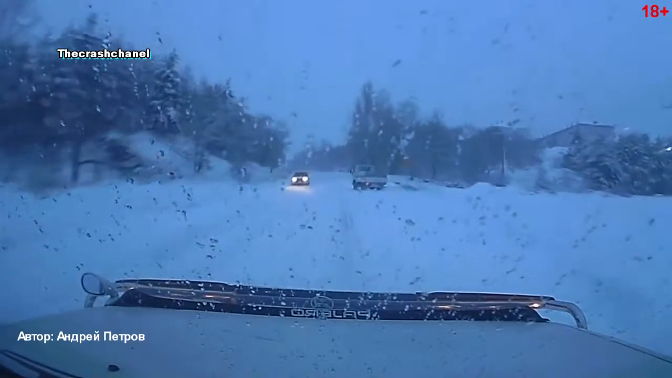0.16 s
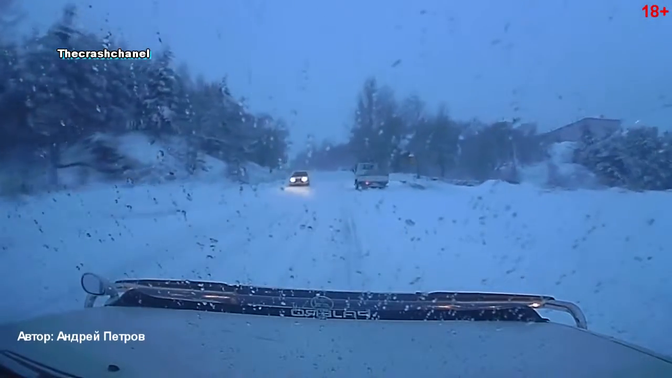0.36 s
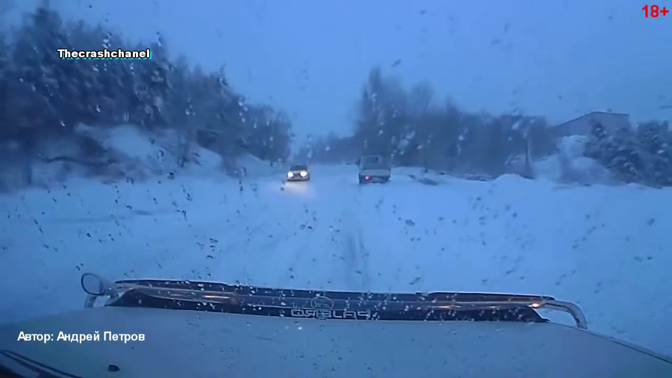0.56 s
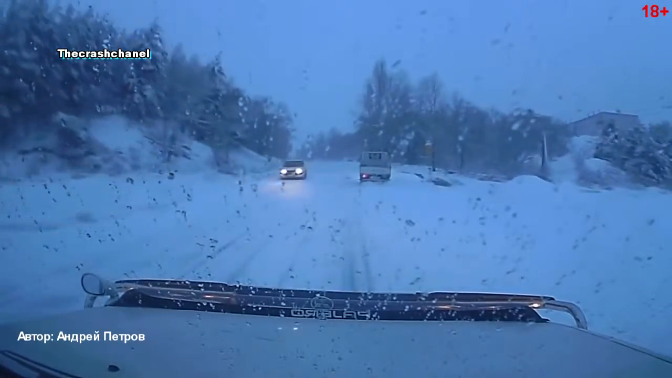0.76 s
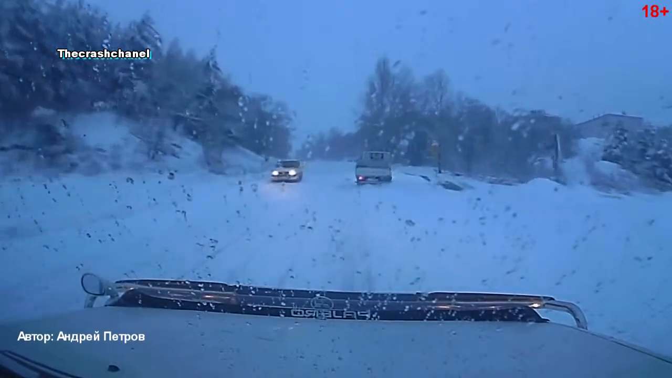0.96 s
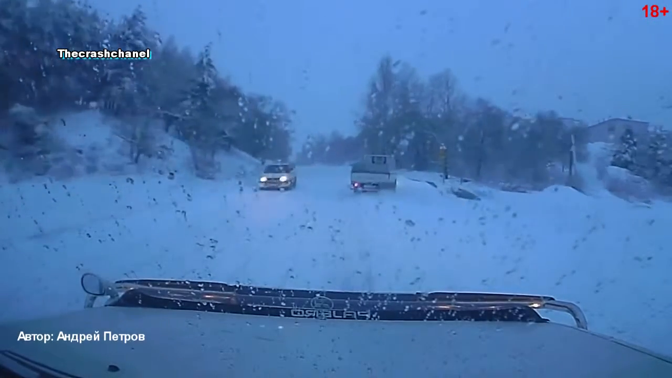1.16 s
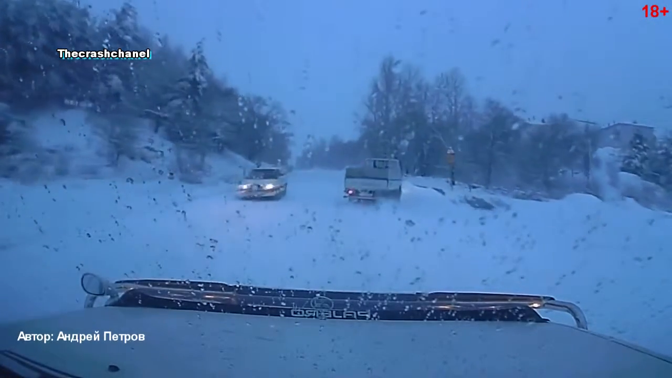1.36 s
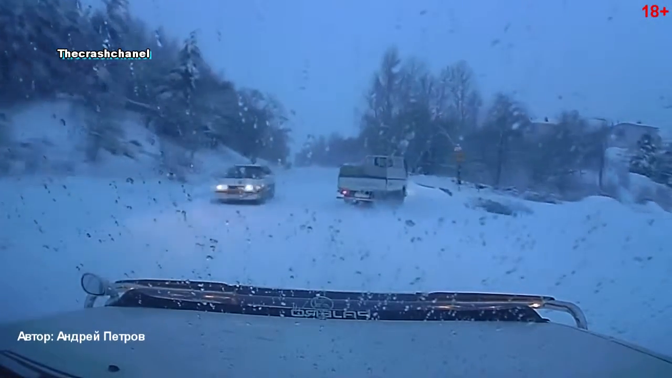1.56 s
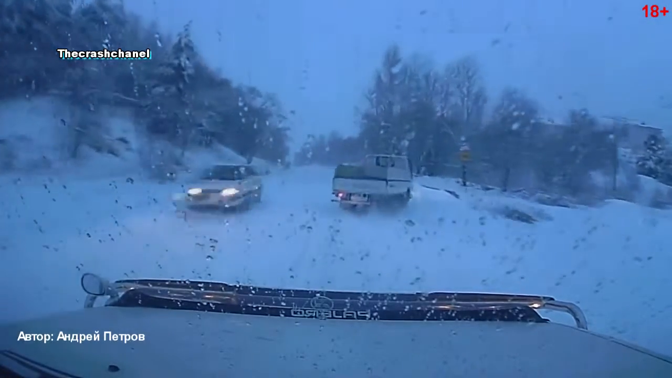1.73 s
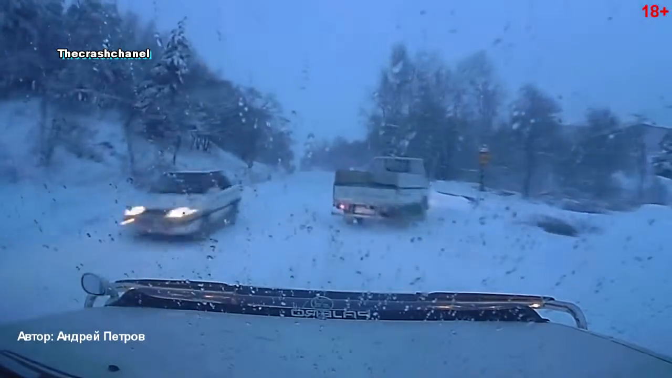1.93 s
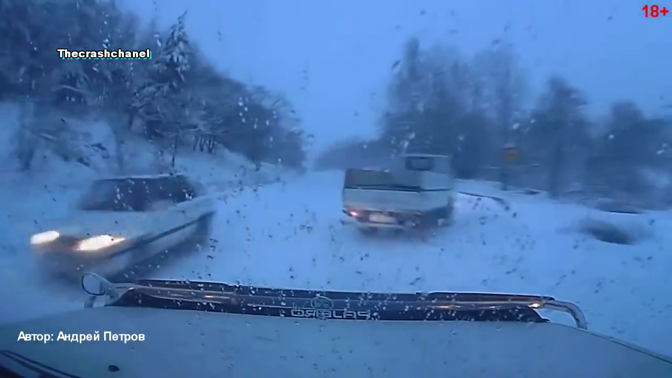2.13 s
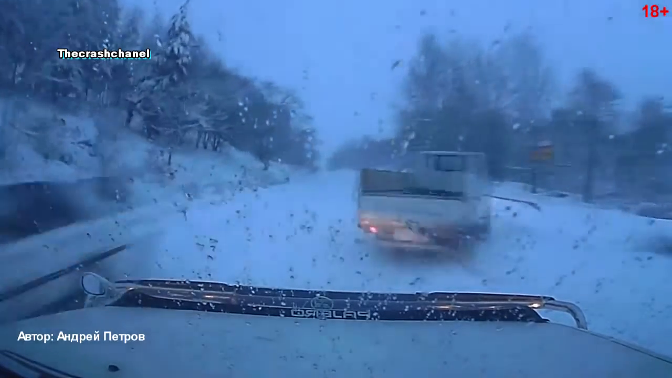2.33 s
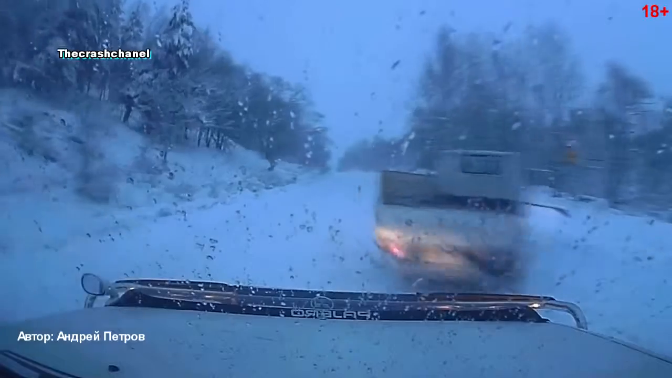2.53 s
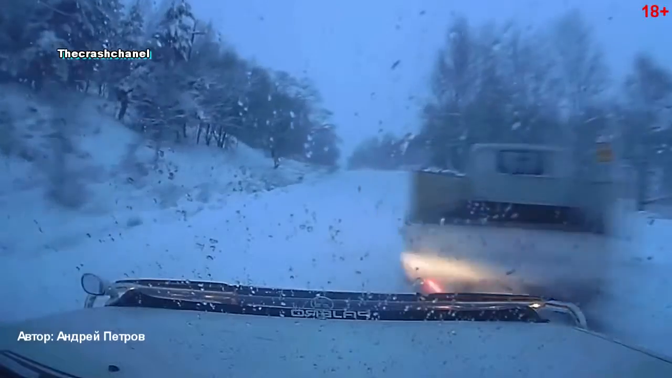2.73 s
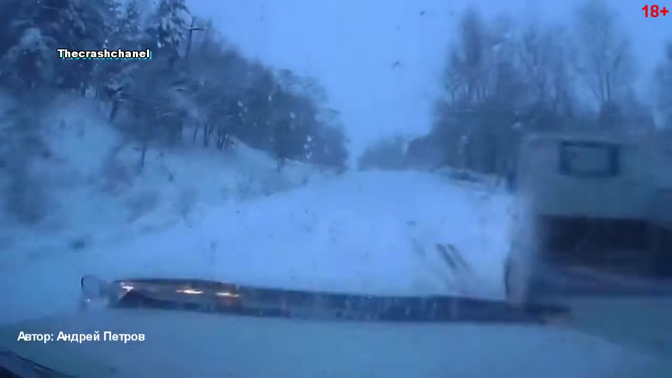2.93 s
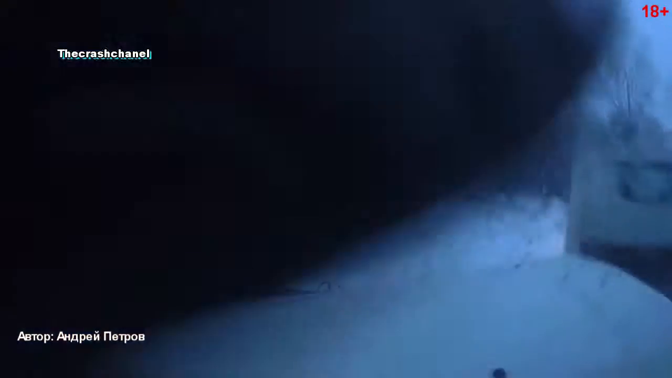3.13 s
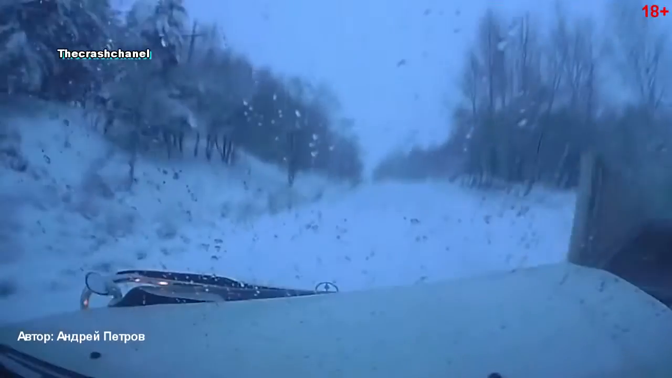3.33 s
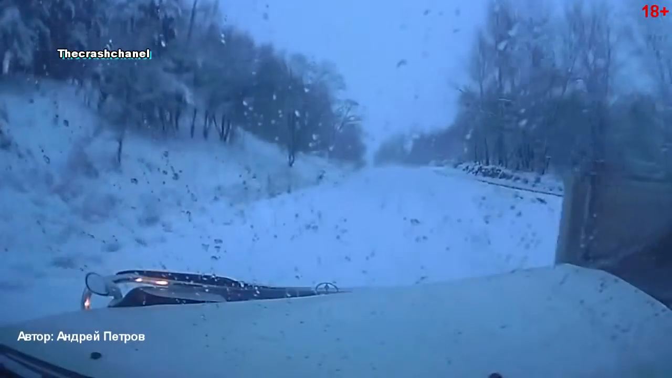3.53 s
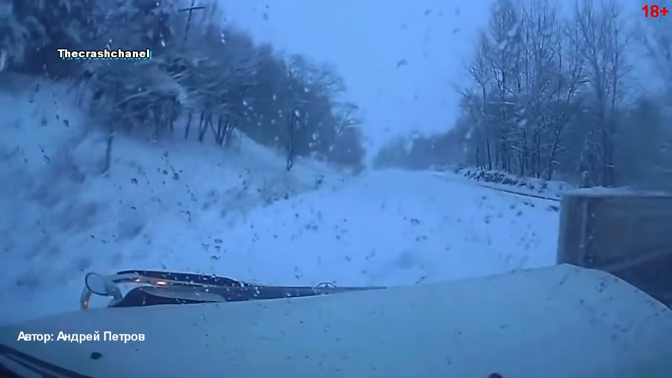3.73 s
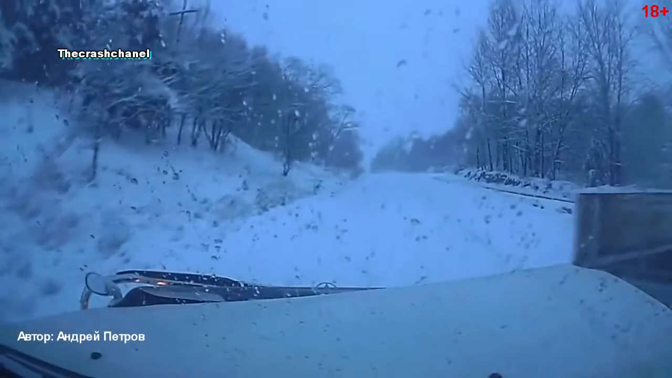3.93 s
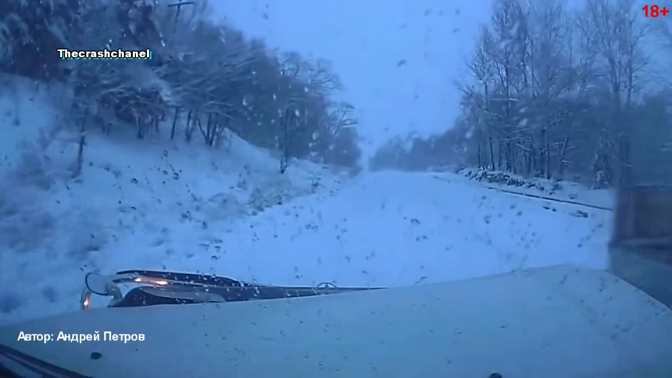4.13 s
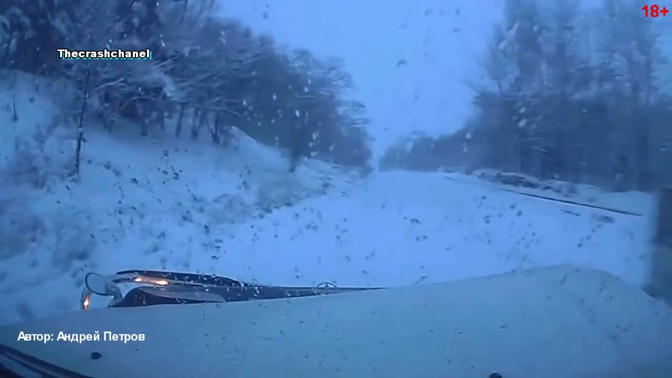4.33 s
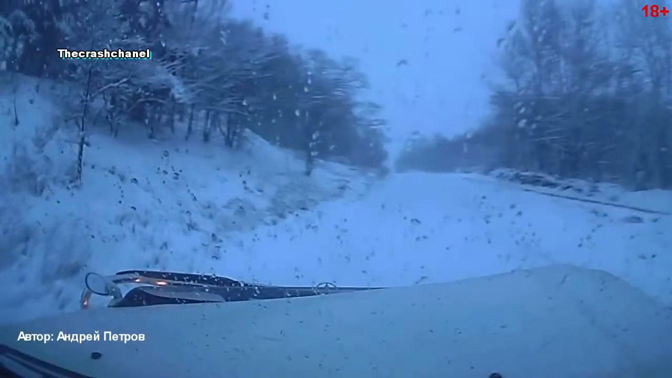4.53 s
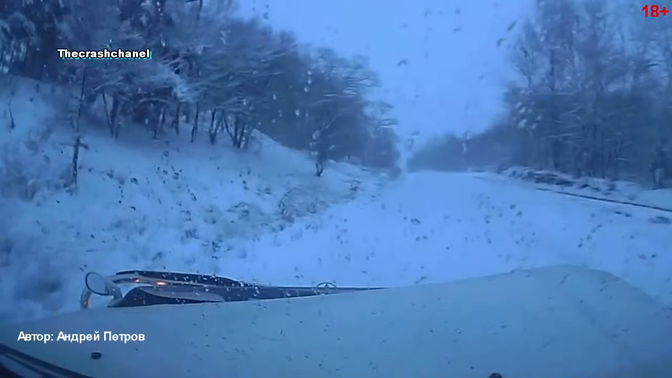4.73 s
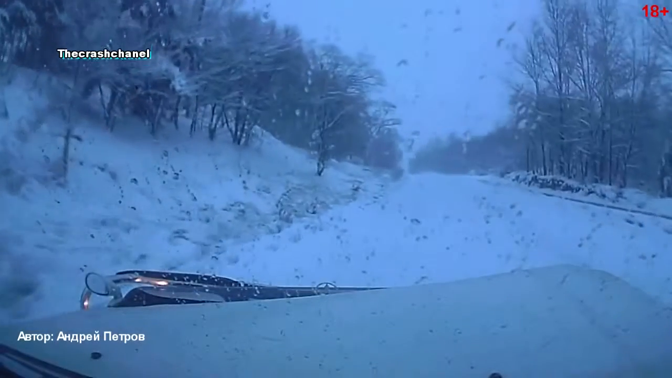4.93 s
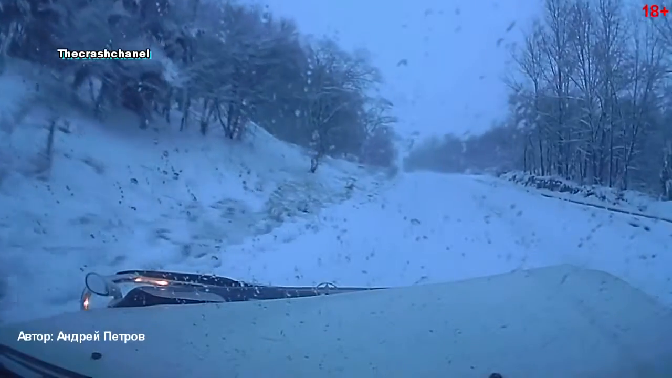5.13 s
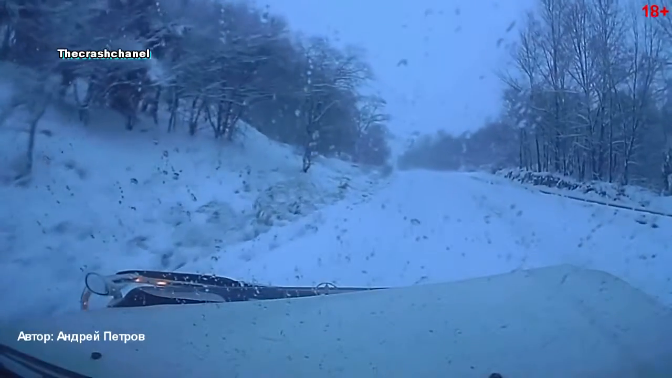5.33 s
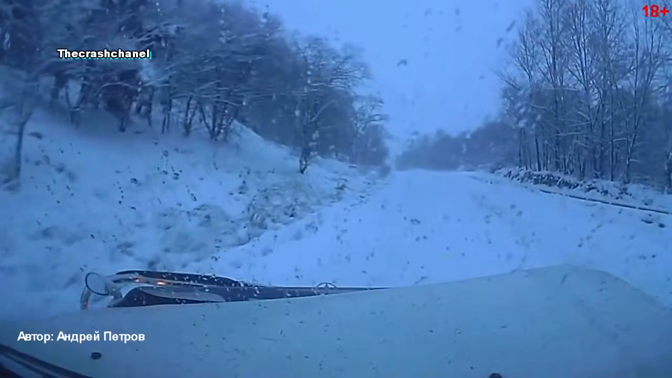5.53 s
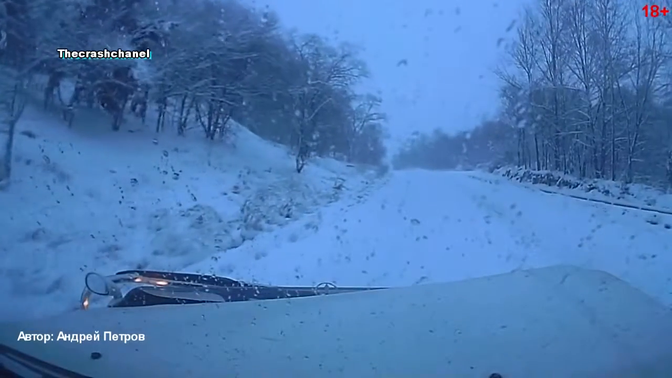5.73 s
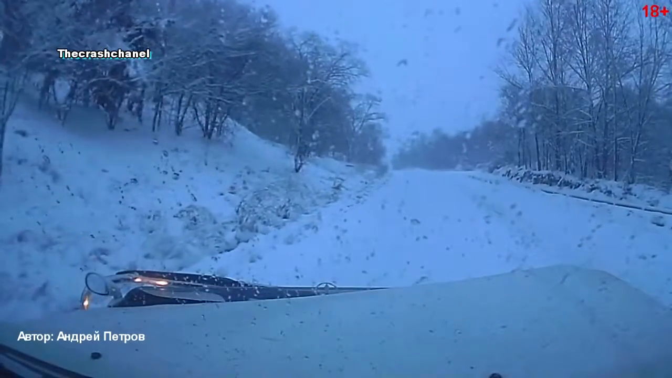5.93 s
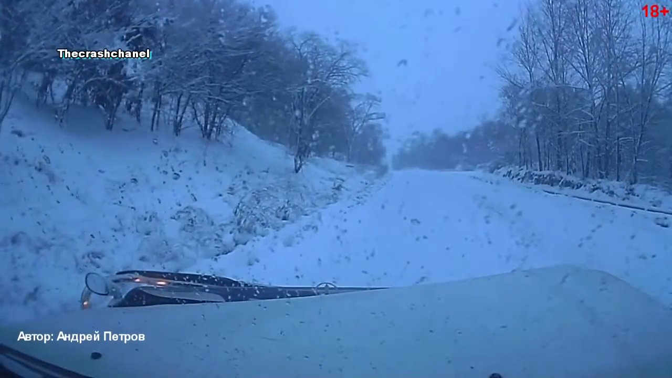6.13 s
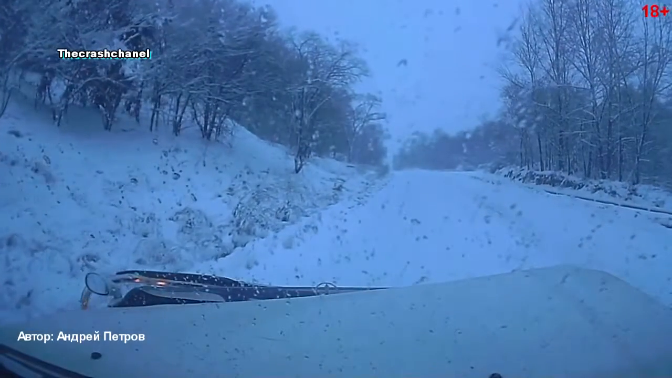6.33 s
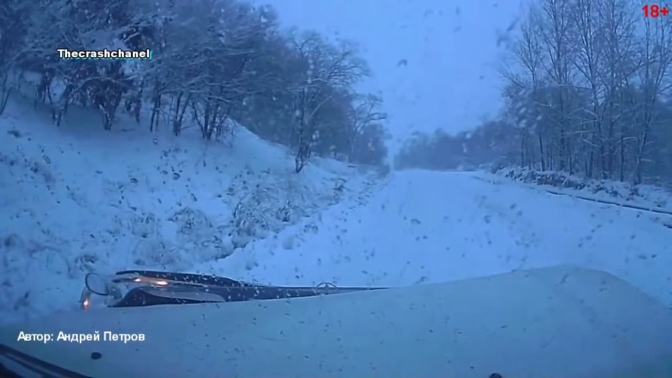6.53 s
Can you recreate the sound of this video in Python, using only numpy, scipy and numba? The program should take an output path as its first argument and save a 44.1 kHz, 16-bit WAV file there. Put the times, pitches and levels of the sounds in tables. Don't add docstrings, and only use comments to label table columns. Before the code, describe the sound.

Heard from inside a car through a small, hissy dashboard microphone. From 0 to 2 seconds, muffled tyre rumble on packed snow and a low chassis boom, with soft trim knocks and a brief low drone at the start. From 2 to 2.9, plastic creaks and knocks, a strong thump at 2.7. At 3.02 the car strikes a truck: a sudden, overloaded burst of folding sheet metal, deep thud, sharp snaps and splintering plastic, about 0.15 seconds long. A second slam at 3.23 leads into clattering rebounds and bright tinkling glass, fading by 3.8. A quiet gap with small ticks follows. From 4.2 to 5.4, snow grinds hollowly under the floor with a low shuddering groan and hard lumps cracking; rapid, heavy judders knock from 5.02 to 5.36. Then it stops: faint low engine idle, soft rumble, hiss, intermittent thin electronic buzz, and a last knock at 6.54.

```python
import sys
import numpy as np
from scipy import signal
from scipy.fft import rfft, irfft, next_fast_len
from scipy.io import wavfile
from scipy.ndimage import uniform_filter1d, map_coordinates
from numba import njit

SR = 44100
rng = np.random.default_rng(int(sys.argv[2]) if len(sys.argv) > 2 else 0)


def how_loud(loudness_db):
    steps = np.asarray(loudness_db, float) / 20
    return 10 ** steps


def log_audio(samples):
    frames = np.atleast_2d(samples).T
    limited = np.clip(frames, -1, 1)
    pcm = np.round(limited * 32767).astype(np.int16)
    wavfile.write(sys.argv[1], SR, pcm)


N = 289957
T = np.arange(N) / SR
IMPACT_S, SECOND_SLAM_S = 3.016, 3.23

# (time [s], level [dB])
CRUSH_FORCE = [
    (3.016, -16.5),
    (3.021, -17.5),
    (3.052, -11),
    (3.15, -16),
    (3.205, -32.5),
    (3.246, -23),
    (3.324, -36),
    (3.744, -46.5),
    (3.85, -64),
]
# (time [s], level [dB])
FOLD_FORCE = [(3.016, -20.5), (3.022, -11.5), (3.045, -12.5), (3.057, -9.5), (3.075, -9), (3.09, -11.5),
              (3.112, -13), (3.125, -10), (3.155, -17)]
# (frequency [Hz], density [dB per Hz])
BONNET_SPECTRUM = [(150, -9), (230, -6.5), (320, -4.5), (450, -11.5), (700, -15.5), (1200, -25),
                   (3000, -56)]
# (frequency [Hz], density [dB per Hz])
STEEL_SPECTRUM = [(71, -39), (120, -11), (192, -6.5), (398, -3.5), (431, -9.5), (664, -9.5), (739, -24),
                  (1150, -20.5), (1920, -51), (2200, -36.5), (3000, -50.5), (3900, -63), (6600, -120)]
# (frequency [Hz], density [dB per Hz])
SPLINTER_SPECTRUM = [(1500, -27.5), (2250, -11), (2700, -11), (3200, 2), (3800, -15.5), (4550, -2),
                     (5100, 0), (5550, -10), (8000, -9.5), (15500, -13.5)]
# (time [s], peak [dB], edge [ms])
SNAPS = [(3.0179, -37.5, 0.36), (3.0204, -36, 0.084), (3.0244, -36.5, 0.16), (3.0311, -39, 0.11),
         (3.032, -42.5, 0.048), (3.0355, -37.5, 0.14), (3.0389, -35.5, 0.1), (3.0424, -33, 0.1),
         (3.0469, -33, 0.065), (3.0497, -35, 0.08), (3.0523, -28.5, 0.096), (3.0548, -20.5, .055),
         (3.0567, -33.5, .06), (3.0597, -27, 0.074), (3.0631, -31, 0.096), (3.066, -26, 0.053),
         (3.0699, -28, 0.09), (3.0708, -32, 0.1), (3.0768, -34, .08), (3.0832, -32.5, 0.089),
         (3.09, -31.5, 0.13), (3.0943, -33, 0.096), (3.097, -34, 0.082), (3.1051, -32, 0.11),
         (3.1088, -35, 0.12), (3.1153, -28.5, 0.2), (3.1216, -32, .1), (3.1247, -30.5, 0.12),
         (3.1287, -26.5, 0.17), (3.1351, -38, 0.073), (3.1459, -34, 0.2), (3.1624, -44.5, 0.13),
         (3.1717, -36.5, 0.24), (3.175, -27, 0.45), (3.231, -43, 0.21), (3.2494, -59, 0.019),
         (3.253, -58, .03), (3.287, -49, 0.12)]
# (time [s], peak [dB], low panel [Hz], click [dB])
REBOUND_BLOWS = [(3.16, -17, 370, -26), (3.18, -26, 247, -45), (3.193, -24.5, 244, -45),
                 (3.208, -31, 289, -45), (3.218, -29, 269, -45), (3.23, -17.5, 452, -27),
                 (3.241, -32, 366, -32), (3.248, -22.5, 403, -17), (3.255, -22, 376, -40),
                 (3.268, -32, 305, -36), (3.283, -25.5, 421, -23), (3.293, -25.5, 299, -26),
                 (3.325, -28.5, 271, -40), (3.346, -26.5, 413, -40), (3.355, -28, 374, -40),
                 (3.381, -33, 260, -33), (3.414, -25.5, 274, -37), (3.437, -25.5, 400, -32),
                 (3.455, -25, 341, -36), (3.495, -34.5, 370, -36), (3.539, -46, 380, -37),
                 (3.578, -32, 290, -45), (3.602, -29.5, 340, -33), (3.617, -28, 256, -42),
                 (3.634, -31.5, 280, -40), (3.652, -38, 288, -40), (3.669, -38, 262, -22),
                 (3.699, -35.5, 300, -28), (3.716, -39, 367, -29), (3.734, -37, 286, -29)]
# (time [s], frequency [Hz], level [dB], t60 [s])
GLASS_MODES = [(3.205, 12600, -60, .25), (3.23, 3150, -44, 0.42), (3.24, 4366, -47, 0.48),
               (3.275, 4650, -46, 0.3), (3.285, 4350, -58, 0.13), (3.285, 2250, -43.5, 0.2),
               (3.285, 10600, -58, .08), (3.29, 7105, -60, 0.24), (3.29, 11800, -66, 0.16),
               (3.3, 8750, -60, .25), (3.315, 11290, -62, 0.38), (3.315, 14100, -86, 0.28),
               (3.33, 14730, -71, .2), (3.335, 5550, -64, .3), (3.34, 8397, -69, .3),
               (3.36, 10380, -93, 0.28), (3.37, 3300, -58, 0.21), (3.385, 5550, -60, 0.45),
               (3.39, 8311, -65, .25), (3.39, 11714, -66, 0.43), (3.41, 9800, -64, .2),
               (3.41, 7105, -59.5, 0.59), (3.415, 4600, -58, .25), (3.43, 14000, -69, 0.56),
               (3.43, 6589, -69, 0.55), (3.43, 12660, -70, 0.25), (3.435, 11100, -66, .5),
               (3.44, 13400, -72, .5), (3.47, 9400, -70, .35), (3.47, 8000, -56, .057),
               (3.475, 5400, -66, .1), (3.47, 7105, -61, 0.28), (3.49, 4660, -72, .15),
               (3.49, 12575, -77, .25), (3.5, 9700, -69, 0.55), (3.5, 9860, -71, 0.76),
               (3.51, 13522, -72, .6), (3.52, 14125, -74, .7), (3.556, 4608, -53.5, 0.11),
               (3.558, 12187, -72, .3), (3.575, 7105, -62.5, 0.29), (3.62, 4694, -71, .15),
               (3.67, 4820, -73, .15)]
# (time [s], level [dB])
PLOUGH_FORCE = [(4.12, -63), (4.185, -49), (4.25, -39), (4.71, -39), (4.75, -41), (5.0, -43), (5.06, -38),
                (5.38, -44.5), (5.5, -87)]
# (frequency [Hz], density [dB per Hz])
PAN_SPECTRUM = [(35, -33), (60, -8), (102, -4), (135, -2.5), (177, -11), (221, -3), (324, -1.5), (406, -6),
                (700, -26), (910, -36), (1540, -120)]
# (frequency [Hz], density [dB per Hz])
SILL_SPECTRUM = [(320, -38), (550, 0), (660, 0.5), (723, -8.5), (833, 3), (898, -5), (967, -3.5),
                 (1280, -16.5), (1480, -19), (1850, -30.5), (2090, -27), (2660, -37.5), (4000, -49),
                 (5200, -75), (8800, -120)]
# (frequency [Hz], width [Hz], level [dB])
BRACKET_MODES = [(832, 55, 2.5), (988, 55, -5.5), (1360, 65, -17), (2000, 70, -29), (2320, 70, -26)]
# (time [s], frequency [Hz], level [dB])
AXLE_GROAN = [(4.2, 104, -73), (4.4, 110.5, -33), (4.6, 105.7, -30), (4.72, 106, -37), (4.76, 97.8, -48),
              (4.92, 96.4, -45), (4.96, 100.7, -29.5), (5.01, 109.3, -52), (5.42, 104, -42)]
# (time [s], peak [dB], low panel [Hz])
WHEEL_SLIPS = [(5.024, -18, 302), (5.044, -20.5, 347), (5.055, -10, 315), (5.067, -16, 338),
               (5.089, -13.5, 248), (5.099, -21, 320), (5.122, -18, 292), (5.13, -10.5, 286),
               (5.149, -19, 478), (5.162, -16.5, 370), (5.188, -19.5, 248), (5.209, -23, 327),
               (5.226, -13, 294), (5.252, -15.5, 205), (5.259, -27, 327), (5.284, -15.5, 294),
               (5.306, -36, 330), (5.315, -16.5, 336), (5.344, -19, 395), (5.36, -26, 344)]
# (time [s], peak [dB], ring [Hz], top of crack [Hz])
ICE_LUMPS = [(1.887, -57.5, 3370, 5070), (1.892, -56, 920, 2140), (1.968, -54, 990, 1490),
             (2.05, -68, 1200, 3600), (2.145, -66, 3000, 4000), (2.165, -68, 2900, 3600),
             (2.18, -68, 2680, 3600), (2.703, -47, 705, 1590), (2.705, -50.5, 1300, 2820),
             (3.009, -58, 1500, 5000), (3.0155, -33, 1200, 5050), (3.23, -42, 1170, 2760),
             (3.161, -38.5, 4700, 7500), (3.2495, -42, 4600, 7000), (3.347, -46, 800, 1600),
             (3.413, -44, 1280, 2600), (3.456, -43, 1080, 2000), (3.602, -42, 654, 1460),
             (3.775, -58, 1280, 3400), (3.794, -56, 900, 1500), (4.0643, -59.5, 2090, 2500),
             (4.107, -65, 2560, 3200), (4.18, -51, 1980, 2420), (4.182, -37.5, 450, 1400),
             (4.2575, -49, 2470, 3360), (4.3185, -54, 2000, 3350), (4.389, -47, 2220, 2670),
             (4.395, -57, 3080, 3300), (4.437, -60, 2290, 2800), (4.4883, -61, 1980, 2400),
             (4.799, -58, 2170, 2900), (5.026, -49, 600, 1300), (5.05, -60, 2080, 2800),
             (5.127, -42, 600, 1190), (5.136, -42, 2040, 2670), (5.14, -52, 1900, 2600),
             (5.15, -53, 2000, 2536), (5.208, -50, 700, 1280), (5.345, -59, 2290, 3230)]
# (time [s], level [dB])
ROAD_LEVEL = [(0.0, -53.5), (0.18, -52), (0.73, -58), (0.96, -58), (2.41, -58), (2.61, -52), (3.01, -53.5),
              (3.8, -58), (4.16, -61.5), (5.42, -61), (5.816, -62), (6.57, -61)]
# (frequency [Hz], density [dB per Hz])
CABIN_SPECTRUM = [(53, -41), (90, -3), (162, -6.5), (255, -4.5), (291, -1), (547, -8.5), (606, -15),
                  (1010, -19.5), (1360, -36), (1460, -37), (3000, -45), (3900, -58), (6600, -120)]
# (frequency [Hz], density [dB per Hz])
BOOM_SPECTRUM = [(10, -19.5), (19, -4), (28, 2.5), (42, 4.5), (60, -3), (91, -11), (130, -12), (170, -30.5),
                 (290, -120)]
# (time [s], frequency [Hz], level [dB])
TYRE_DRONE = [(0.0, 144.8, -57), (0.38, 142.5, -54), (0.5, 136, -80)]
# (time [s], firing note [Hz], level [dB])
ENGINE_IDLE = [(5.45, 47.7, -54), (5.49, 49.5, -61), (6.404, 47.3, -63), (6.57, 45.7, -77.5)]
# (time [s], frequency [Hz], level [dB])
DASH_CREAKS = [
    [(2.02, 430, -35), (2.05, 393.5, -55.5), (2.13, 386, -48.5), (2.17, 368, -55)],
    [(2.54, 311.3, -51.5), (2.6, 300.4, -46), (2.63, 305, -36.5), (2.66, 300, -65)],
]
# (time [s], peak [dB], low panel [Hz], click [dB])
TRIM_KNOCKS = [(0.048, -42.5, 314, -28), (0.302, -42.5, 294, -31), (0.499, -44, 398, -27),
               (0.798, -44.5, 287, -32), (1.359, -47.5, 386, -40), (1.889, -43.5, 396, -40),
               (2.037, -37, 380, -38), (2.051, -37.5, 361, -31), (2.116, -38, 400, -35),
               (2.365, -43, 440, -30), (2.459, -42.5, 145, -28), (2.561, -42, 320, -26),
               (2.615, -37, 298, -28), (2.705, -19.5, 266, -38), (2.713, -30.5, 257, -32),
               (2.721, -29.5, 230, -33), (2.75, -34, 225, -34), (2.801, -39.5, 292, -42),
               (2.835, -43, 250, -38), (2.857, -47, 248, -22), (2.959, -48, 368, -51),
               (3.77, -58, 277, -14), (3.793, -49, 282, -30), (3.823, -45, 282, -33),
               (4.068, -53, 354, -38), (6.544, -40.5, 298.5, -27)]
# (time [s],
# frequency [Hz], level [dB], t60 [s])
LOOSE_TICKS = [(2.707, 480, -28, 0.098), (3.602, 584, -20.5, 0.027), (3.794, 707, -50, 0.055),
               (5.347, 555, -40, 0.054), (2.03, 790, -50, 0.13), (2.05, 1053, -50, 0.11),
               (2.11, 1140, -55, 0.096), (2.465, 1080, -51.5, 0.056), (2.8, 1088, -50, 0.17),
               (2.835, 1250, -52, 0.076), (2.86, 1600, -52, 0.041), (2.96, 1120, -54, 0.1),
               (3.412, 2130, -47, 0.075), (3.436, 2110, -47, 0.065), (3.456, 2330, -47, 0.068),
               (3.457, 2560, -51, .04), (3.77, 2000, -60, 0.1), (3.06, 38, -28, 0.99),
               (5.137, 1270, -38.5, 0.099), (5.146, 990, -35.5, 0.055), (5.39, 885, -57, 0.39),
               (.53, 91.9, -50, 1), (3.823, 730, -44, 0.11), (4.074, 914, -51.5, 0.26),
               (5.88, 1120, -57, 0.07), (6.545, 833, -45, 0.096), (.43, 4560, -81, 0.22),
               (.92, 4500, -69, .1), (1.27, 4480, -76, 1), (2.32, 4600, -72, .1)]
# (frequency [Hz], density [dB per Hz])
HISS_SPECTRUM = [(1060, 6), (1800, -2), (3810, -5.5), (4530, -5), (4920, -5.5), (7630, -7.5), (8210, -7),
                 (9250, -7), (14900, -10), (16000, -12.5)]
# (frequency [Hz], wander [Hz], level [dB])
CIRCUIT_WHINES = [(3229, 8, -99), (4490, 40, -92.5), (7940, 11, -101), (14750, 10, -89.5)]
# (from [s], to [s])
MEMORY_WRITES = [(.07, .27), (.63, .91), (1.01, 1.23), (1.63, 1.91), (2.03, 2.21), (2.61, 2.81),
                 (3.63, 3.85), (4.03, 4.21), (4.61, 4.81), (5.01, 5.21), (5.67, 5.93), (6.01, 6.09),
                 (6.13, 6.25)]
# (frequency [Hz], width [Hz], level [dB])
BUZZ_BANDS = [(3250, 260, -3.5), (6520, 190, -9), (7100, 400, -9.5), (8070, 470, -2), (11440, 880, -8.5),
              (14900, 500, -6)]


def unit(x):
    return x / np.sqrt(np.mean(x ** 2) + 1e-20)


def curves(rows):
    s, *cols = np.transpose(rows)
    inside_s = np.minimum(T - s[0] + 1e-3, s[-1] - T + 1e-3)
    already_on = (s[0] == 0) * (T < .1)
    gate = np.clip(inside_s * 50 + already_on, 0, 1)
    return [np.interp(T, s, c) for c in cols] + [gate]


def wobble(rate_hz):
    return map_coordinates(rng.standard_normal(int(N * rate_hz / SR) + 4), [T * rate_hz])


def sweep(hz):
    return 2 * np.pi * np.cumsum(hz) / SR


def coloured(x, points):
    m = next_fast_len(N + 8192)
    f, db = np.transpose(points)
    log_hz = np.log(np.fft.rfftfreq(m, 1 / SR) + 1)
    gain = how_loud(np.interp(log_hz, np.log(f + 1), db, left=-120, right=-120))
    return unit(irfft(rfft(x, m) * gain, m)[:N])


def grit(points, spike_db, lump_db, lump_rate):
    sizes = how_loud(spike_db * wobble(900) + lump_db * wobble(lump_rate))
    return coloured(sizes * rng.standard_normal(N), points)


def tone(rows, blur_hz, flutter_db):
    hz, db, gate = curves(rows)
    turn = sweep(hz + blur_hz * wobble(25))
    level = how_loud(db + 0.5 + flutter_db * wobble(19))
    return gate * level * (np.sin(turn) + 0.31 * np.sin(2 * turn))


def blows(rows, attack, t60, high_hz, high_db, puff, puff_hz, grows=0):
    out, t = np.zeros(N + SR), np.arange(SR // 5) / SR
    dull = signal.butter(5, [180, puff_hz], "bandpass", fs=SR, output="sos")
    sharp = signal.butter(2, [1700, 4800], "bandpass", fs=SR, output="sos")
    loudest_db = max(row[1] for row in rows)
    for s, db, low_hz, click_db in rows:
        noise = rng.standard_normal((2, len(t)))
        struck_hz = high_hz * (1 + 0.062 * noise[0, 0])
        ring = np.sin(2 * np.pi * low_hz * t) + how_loud(high_db) * np.sin(2 * np.pi * struck_hz * t)
        puff_gain = puff * how_loud(grows * (db - loudest_db))
        body = ring + puff_gain * unit(signal.sosfilt(dull, noise[0]))
        swell = how_loud(-60 * t / t60) * (1 - np.exp(-t / attack))
        click = how_loud(click_db - 1 - 60 * t / 0.045) * unit(signal.sosfilt(sharp, noise[1]))
        out[round(s * SR):][:len(t)] += how_loud(db) * (swell * body + click)
    return out[:N]


def pings(rows, attack, rough):
    out = np.zeros(N + SR)
    for s, hz, db, t60 in rows:
        t = np.arange(round(min(t60, 1) * SR / 2)) / SR
        beat = 1 + .5 * np.cos(2 * np.pi * rng.uniform(15, 50) * t)
        chatter = np.interp(t * 250, np.arange(130), rng.standard_normal(130))
        fade = (1 - np.exp(-t / attack)) * (1 - t / t[-1])
        mode = np.sin(2 * np.pi * hz * t + rough * chatter)
        out[round(s * SR):][:len(t)] += how_loud(db - 60 * t / t60) * fade * beat * mode
    return out[:N]


def crash():
    force_db, _ = curves(CRUSH_FORCE)
    since_s = T - IMPACT_S
    gate = np.clip(since_s / .003, 0, 1) * (T < CRUSH_FORCE[-1][0])
    blow = np.interp(T, [3.016, 3.019, 3.15, 3.16], [0, 1, 1, 0])
    buckle = blow * bonnet()
    settle = (1 - blow) * how_loud(force_db - 2.0) * grit(STEEL_SPECTRUM, spike_db=3.5, lump_db=1.0, lump_rate=50)
    crushed = gate * (buckle + settle + thud(force_db, since_s) + splinters(force_db, since_s, blow))
    rebounds = blows(REBOUND_BLOWS, attack=0.00072, t60=0.08, high_hz=480, high_db=-4.5,
                     puff=0.38, puff_hz=1278, grows=0.34)
    return crushed + snaps() + rebounds + glass()


def bonnet():
    fold_db, _ = curves(FOLD_FORCE)
    return how_loud(fold_db) * grit(BONNET_SPECTRUM, spike_db=1.0, lump_db=3.5, lump_rate=42)


def thud(force_db, since_s):
    spectrum = [(25, 1.0), (40, 13.5), (70, -3.5), (120, 8.5), (200, -16.5)]
    level = np.clip(since_s / 0.027, 0, 1) * how_loud(-5 + 0.88 * force_db)
    return level * grit(spectrum, spike_db=-2.5, lump_db=-0.5, lump_rate=15)


def splinters(force_db, since_s, blow):
    broken = how_loud(-18 + 2.06 * force_db - 14 * blow)
    dies_db = 40 * since_s
    rises_db = 153 * np.clip(SECOND_SLAM_S - T, 0, 1)
    debris = how_loud(-50.5 - dies_db - rises_db)
    return (broken + debris) * grit(SPLINTER_SPECTRUM, spike_db=3.5, lump_db=2.5, lump_rate=60)


def snaps():
    out, t = np.zeros(N), (np.arange(400) - 200) / SR
    for s, db, edge_ms in SNAPS:
        push = np.tanh(t * 1000 / edge_ms) * np.exp(-np.abs(t) / 0.00069)
        out[round(s * SR) - 200:][:400] += how_loud(db + 26.5) * push
    return out


def glass():
    fragments = pings(GLASS_MODES, attack=0.0063, rough=0.9)
    return fragments + pings(shards(count=600), attack=0.0016, rough=.6)


def shards(count):
    u = rng.random((count, 4))
    late_s = .6 * u[:, 0] ** 1.4
    hz = 2500 * 6 ** u[:, 1]
    db = -57 - 24 * late_s - 1.5 * np.log2(hz / 2500) - 14 * u[:, 2]
    t60_s = .02 + .15 * u[:, 3] ** 4
    return np.transpose([3.2 + late_s, hz, db, t60_s])


def slide():
    pan_db, gate = curves(PLOUGH_FORCE)
    sill_db = pan_db - 7.5 - 4.5 * (T - PLOUGH_FORCE[0][0])
    shake = how_loud(pan_db - 4) * grit(BOOM_SPECTRUM, spike_db=1, lump_db=1.5, lump_rate=9)
    pan = how_loud(pan_db + 4.5) * grit(PAN_SPECTRUM, spike_db=1.5, lump_db=1.0, lump_rate=510)
    sill = how_loud(sill_db) * grit(SILL_SPECTRUM, spike_db=3.0, lump_db=0.0, lump_rate=23)
    ringing = how_loud(sill_db - 6.5) * brackets()
    spray = how_loud(pan_db - 34.5) * coloured(rng.standard_normal(N), HISS_SPECTRUM)
    groan = tone(AXLE_GROAN, blur_hz=5.55, flutter_db=2.5)
    return gate * (pan + sill + ringing + shake + spray) + groan + judder() + ice()


def brackets():
    f = np.fft.rfftfreq(N, 1 / SR)
    grains = how_loud(2.4 * wobble(700) + 3.4 * wobble(30)) * rng.standard_normal(N)
    response = sum(how_loud(db) / (1 + 1j * (f - hz) / (w / 4)) ** 2 for hz, w, db in BRACKET_MODES)
    return unit(irfft(rfft(grains) * response, N))


def judder():
    click_db = -63
    rows = [(*row, click_db) for row in WHEEL_SLIPS]
    return blows(rows, attack=0.0026, t60=0.033, high_hz=478, high_db=-12, puff=0.045, puff_hz=900)


def ice():
    crack_t60_s, ring_t60_s = 0.026, 0.048
    out, t = np.zeros(N + SR), np.arange(SR // 20) / SR
    for s, db, hz, top_hz in ICE_LUMPS:
        band = signal.butter(5, [top_hz / 2.5, top_hz], "bandpass", fs=SR, output="sos")
        contact = rng.standard_normal(len(t)) + 7.4 * (t == 0)
        crack = signal.sosfilt(band, how_loud(-5.5 - 60 * t / crack_t60_s) * contact)
        crack = crack * np.sqrt(SR / 2 / top_hz)
        swell = how_loud(-60 * t / ring_t60_s) * (1 - np.exp(-t / .0005))
        ring = 0.42 * swell * np.sin(2 * np.pi * hz * t)
        out[round(s * SR):][:len(t)] += how_loud(db) * (crack + ring)
    return out[:N]


def driving():
    tyre_db, _ = curves(ROAD_LEVEL)
    tyres = how_loud(tyre_db) * grit(CABIN_SPECTRUM, spike_db=1.3, lump_db=1.1, lump_rate=12)
    drone = tone(TYRE_DRONE, blur_hz=1.0, flutter_db=-2.2)
    creaks = sum(creak(rows) for rows in DASH_CREAKS)
    knocks = blows(TRIM_KNOCKS, attack=0.0041, t60=0.097, high_hz=459, high_db=-4.5, puff=0.19, puff_hz=1080)
    ticks = pings(LOOSE_TICKS, attack=0.003, rough=1.0)
    return tyres + chassis_boom() + drone + idle() + creaks + knocks + ticks


def chassis_boom():
    braking_db = -56 + 3.5 * T
    resting_db = -52.5 - 2 * (T - IMPACT_S)
    level = how_loud(np.where(T < IMPACT_S, braking_db, resting_db))
    return level * grit(BOOM_SPECTRUM, spike_db=0.1, lump_db=2, lump_rate=4.7)


def idle():
    hz, db, gate = curves(ENGINE_IDLE)
    turn = sweep(hz + 0.47 * wobble(9.3)) / 2
    shaft = how_loud(1.5) * np.sin(turn)
    firing = np.sin(2 * turn) + 0.11 * np.sin(3 * turn) + 0.16 * np.sin(4 * turn)
    return gate * how_loud(db + 8.5 + 0.71 * wobble(5.4)) * (shaft + firing)


def creak(rows):
    hz, db, gate = curves(rows)
    slips = how_loud(4.5 * wobble(70))
    return gate * how_loud(db) * slips * np.sin(sweep(hz + 22 * wobble(60)))


def circuit():
    busy = uniform_filter1d(sum((T > a) * (T < b) * 1. for a, b in MEMORY_WRITES), size=2200)
    hiss = how_loud(-74.5 + 0.35 * busy) * coloured(rng.standard_normal(N), HISS_SPECTRUM)
    whines = sum(how_loud(db + 2.3 * wobble(5.1)) * np.sin(sweep(hz + wander_hz * wobble(40)))
                 for hz, wander_hz, db in CIRCUIT_WHINES)
    buzz_db = np.interp(T, [2, 2.7, 5.2, 5.6], [-80.5, -77, -78, -82.5])
    return hiss + whines + how_loud(buzz_db) * busy * write_buzz()


def write_buzz():
    cycles = np.cumsum(389 + 3 * wobble(26)) / SR
    pulses = np.diff(np.floor(cycles), prepend=0) + 0.096 * rng.standard_normal(N)
    f = np.fft.rfftfreq(N, 1 / SR)
    response = sum(how_loud(db) * np.exp(-((f - hz) / w) ** 2) for hz, w, db in BUZZ_BANDS)
    return unit(irfft(rfft(pulses) * response, N))


def scene():
    return (crash() + slide() + driving())[None]


@njit
def follower(x, fall):
    y = x.copy()
    for i in range(1, len(x)):
        y[i] = max(x[i], y[i - 1] - fall)
    return y


def roll_off(x):
    return signal.sosfilt(signal.butter(12, 16270, fs=SR, output="sos"), x)


def record(dry):
    overloaded = dry[0] / (1 + np.abs(dry[0] / 0.67) ** 4) ** (1 / 4)
    sunk = follower(overloaded, 0.0094)
    coupled = signal.lfilter(*signal.butter(1, 90, "highpass", fs=SR), sunk)
    clipped = coupled / (1 + np.abs(coupled / .42) ** 6) ** (1 / 6)
    band = signal.butter(16, 16000, fs=SR, output="sos")
    limited = signal.sosfiltfilt(band, clipped + circuit())
    return roll_off(limited[None])


dry = scene()
out = record(dry)
log_audio(out)
```